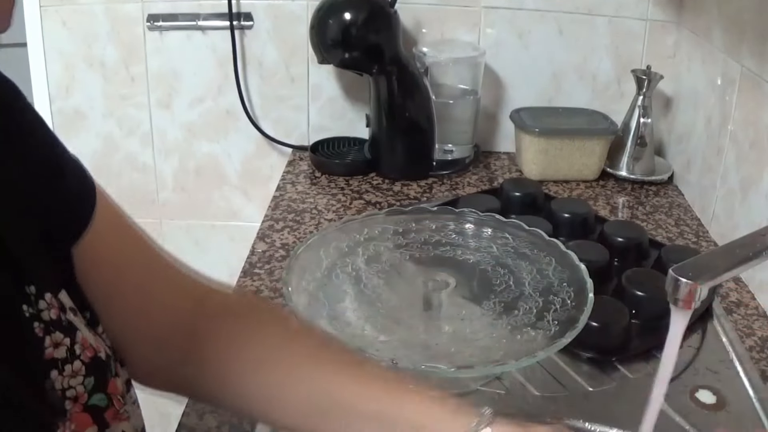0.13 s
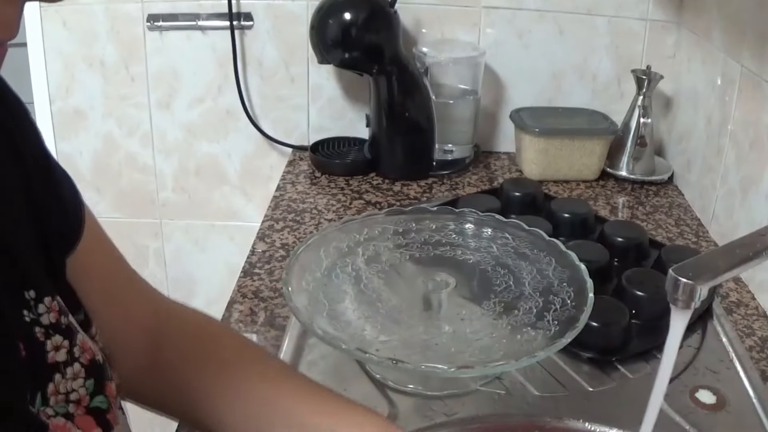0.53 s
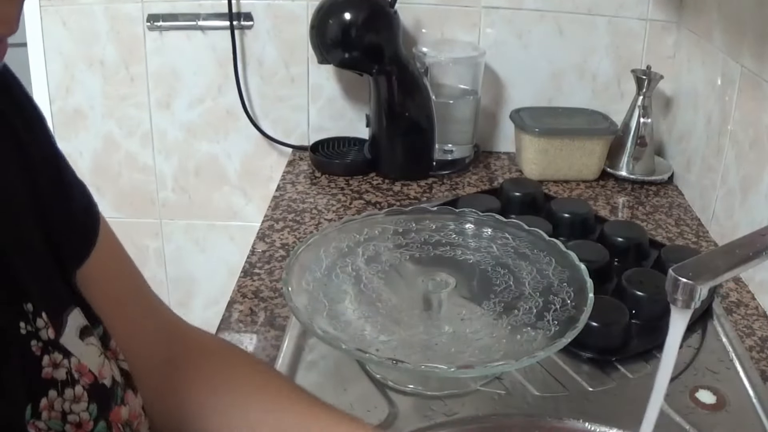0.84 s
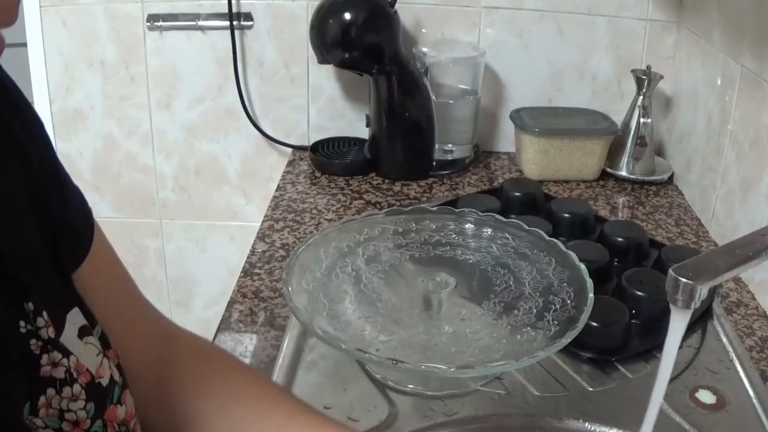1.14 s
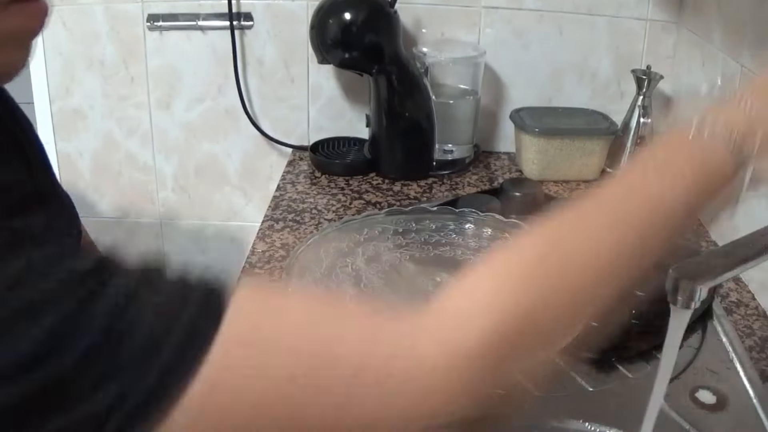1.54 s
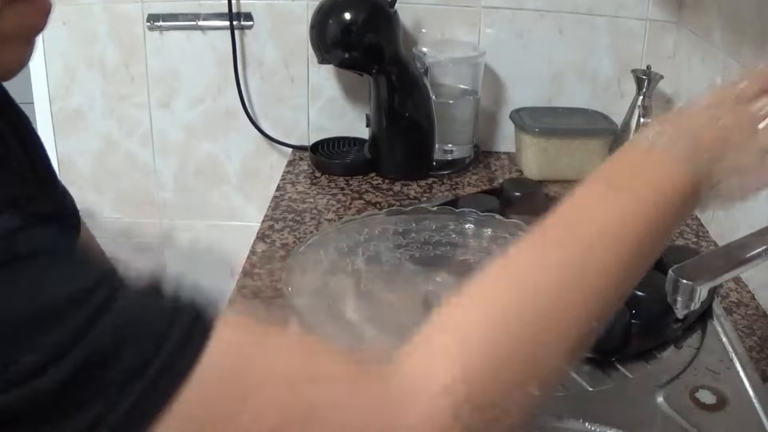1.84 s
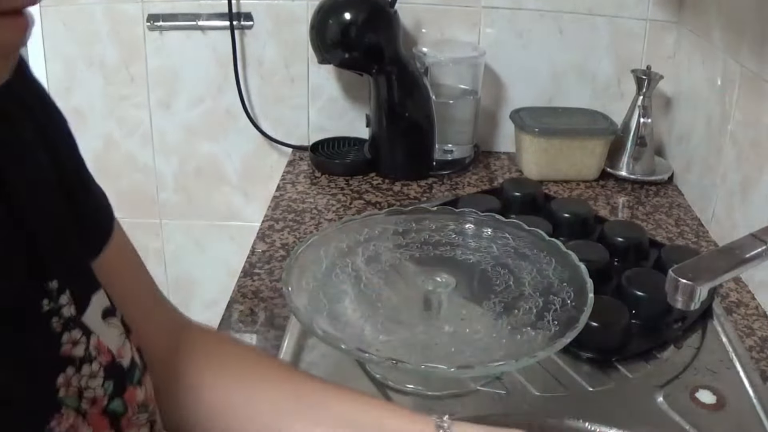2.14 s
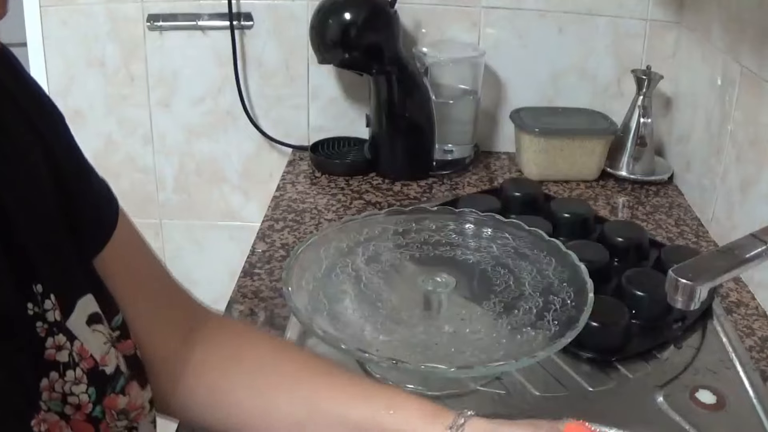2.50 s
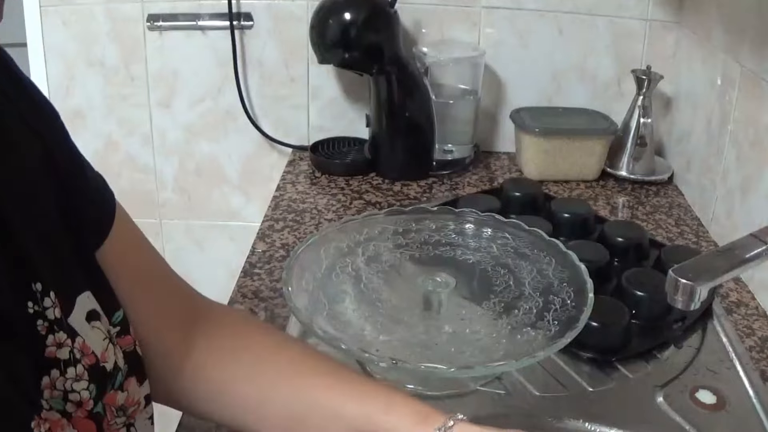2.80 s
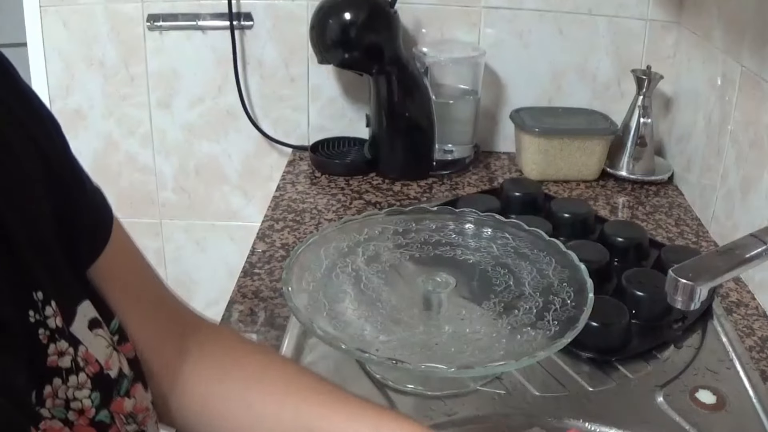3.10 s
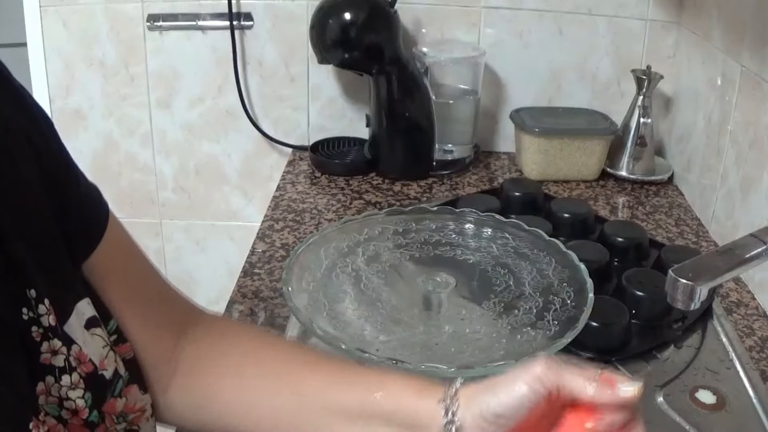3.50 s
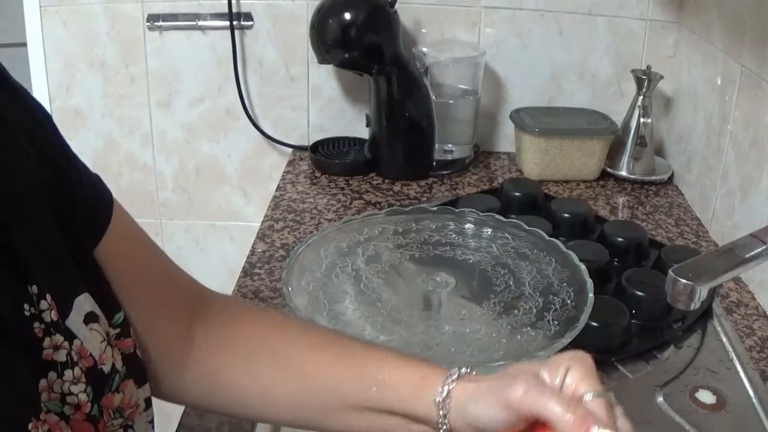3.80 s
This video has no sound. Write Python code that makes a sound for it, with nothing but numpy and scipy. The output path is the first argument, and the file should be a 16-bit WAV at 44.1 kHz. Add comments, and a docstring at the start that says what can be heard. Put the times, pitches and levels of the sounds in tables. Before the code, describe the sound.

A kitchen tap runs softly over a cloth, then brightly on bare steel, and shuts off with sharp drops and dull knocks; a wrung cloth squelches and drips. Close microphone, small tiled kitchen.

```python
"""A kitchen tap runs over a cloth, then straight into a steel sink, and is shut off with a few last drops.
The cloth is wrung out: it squelches, and water patters and bubbles in the basin.
Water is built from noise splats, dying sines for bubbles and a fine wash; the steel from ringing modes.
Noise pushes thump the sink bottom, and a small tiled kitchen reflects it all over quiet room noise."""
import sys
import numpy as np
from scipy import signal
from scipy.fft import rfft, irfft
from scipy.io import wavfile

SR = 44100
rng = np.random.default_rng(int(sys.argv[2]) if len(sys.argv) > 2 else 0)


def wav_out(sig):
    """Save sig, one row per channel (or a flat mono array), as 16-bit PCM at SR to the path in sys.argv[1]."""
    wavfile.write(sys.argv[1], SR, np.round(np.clip(np.atleast_2d(sig).T, -1, 1) * 32767).astype(np.int16))


N = 174195
TIME = np.arange(N) / SR
EDGE_HZ = 11080  # upper limit of the recorder


def amp(db):
    """Decibels to gain."""
    return 10 ** (np.asarray(db) / 20)


def unit(x):
    """Scales to rms 1."""
    return x / np.sqrt(np.mean(x ** 2) + 1e-20)


def level(points):
    """Gain over time from (s, dB) points, at -120 dB outside them."""
    return amp(np.interp(TIME, *np.transpose(points), left=-120, right=-120))


def read(points, hz):
    """Reads a table on a log-frequency axis."""
    f, value = np.transpose(points)
    return np.interp(np.log(hz + 1), np.log(f), value)


def colour(x, tone):
    """Filters a sound by a (Hz, dB) table up to the band edge, at rms 1."""
    hz = np.fft.rfftfreq(N, 1 / SR)
    return unit(irfft(rfft(x) * amp(read(tone, hz)) * (hz < EDGE_HZ), N))


def focus(x, hz, octaves):
    """Stresses the region round one frequency; peak 1."""
    b, a = signal.iirpeak(hz, max(1 / octaves, .4), fs=SR)
    y = signal.lfilter(b, a, x)
    return y / abs(y).max()


def add(mix, s, sound):
    """Mixes a sound in at time s."""
    part = mix[round(s * SR):][:len(sound)]
    part += sound[:len(part)]


def signs():
    """Random polarity for every sample."""
    return rng.choice([-1, 1], N)


def impacts(per_s, spread_db):
    """Impacts at random times; a positive spread makes a few larger, a negative one a few smaller."""
    size = amp(spread_db * np.minimum(rng.exponential(1, N), 2.3))
    return size * (rng.random(N) < per_s / SR)


def room_air():
    """Quiet room: steady noise with most of its weight in the lows."""
    # Spectrum of the room noise: pitch_hz, gain_db
    tone = [(25, -43), (60, -4), (130, -1.5), (250, 0), (500, -8.5), (1500, -14.5), (4000, -18.5),
            (6500, -58), (11000, -23)]
    return amp(-59) * colour(rng.standard_normal(N), tone)


def kitchen(x, right_db, near_db, near_s, room_db):
    """Direct sound, quick reflections off the basin walls, and the tail of the tiled room, in stereo."""
    # Decay of the room: pitch_hz, t60_s
    room_t60 = [(100, 0.12), (1000, 0.3), (4000, 0.16), (11000, 0.11)]
    # Strength of the reflections: pitch_hz, gain_db
    echo_tone = [(60, -32), (200, -9), (500, -2.5), (1500, 0.5), (4000, 2.5), (6500, 8), (9000, -1.5),
                 (11000, 2)]
    t = TIME[:SR // 2]
    hz, at, z = signal.stft(rng.standard_normal((2, len(t))), SR, nperseg=256)
    fading = z * amp(-60 * at / read(room_t60, hz)[:, None])
    tail = signal.istft(fading, SR, nperseg=256)[1][:, :len(t)] * (t > .005)
    near = rng.standard_normal((2, len(t))) * np.exp(-t / near_s) * (t > .0005)
    echo = amp(near_db) * near / np.linalg.norm(near[0])
    echo += amp(room_db) * tail / np.linalg.norm(tail[0])
    echo_gain = amp(read(echo_tone, np.fft.rfftfreq(SR, 1 / SR)))
    echo = irfft(rfft(echo, SR) * echo_gain, SR)[:, :len(t)]
    reflected = signal.fftconvolve(x[None], echo, axes=1)[:, :N]
    return (x + reflected) * amp([[-right_db / 2], [right_db / 2]])


def basin_ring(patch_db=0, detune=0):
    """The basin's answer to one tap, its modes varied by the spot and the water lying there."""
    # Modes of the steel basin: pitch_hz, level_db, t60_s (pitch and level before the variation)
    modes = [(83.7, -12.5, 0.36), (130, 0.5, 0.084), (154.4, 3, 0.096), (213, 2.5, 0.08), (264, 1, 0.066),
             (358.9, -6, 0.25), (455, -3.5, 0.026), (522.8, -6, 0.2), (580.8, -1, 0.13), (878, -7.5, 0.088),
             (1345, -8, 0.098), (1920, -7.5, 0.12), (2387, -6, 0.06)]
    t = TIME[:SR // 3]
    spots = rng.uniform(-1.34, 1, (len(modes), 2))
    ring = np.zeros(len(t))
    for k, ((hz, db, t60), (a, b)) in enumerate(zip(modes, spots)):
        tone = np.sin(2 * np.pi * hz * (1 + detune * b) * t)
        ring += (-1) ** k * amp(db + patch_db * a - 60 * t / t60) * tone
    return ring


def drumming(per_s=70, spread_db=4.5, patch_db=2, detune=0.024, count=10):
    """Falling water keeps the thin steel rumbling; each spot it lands on rings a little differently."""
    # Drumming of the sink bottom: time_s, level_db
    curve = [(0, -53.5), (.34, -46), (.41, -39), (.52, -51.5), (.9, -45), (1.8, -49.5), (2.1, -48.5),
             (2.5, -57), (2.66, -45), (2.8, -41.5), (3.03, -38.5), (3.2, -44.5), (3.55, -56), (3.75, -53.5),
             (3.95, -53.5)]
    out = np.zeros(N)
    for _ in range(count):
        blows = impacts(per_s, spread_db) * signs()
        out += signal.oaconvolve(blows, basin_ring(patch_db, detune))[:N]
    return level(curve) * unit(out)


def knocks(thud_db=-12, thud_s=0.085):
    """Soft blows: a dull thud and part of the basin's ring."""
    # Knocks on the basin: start_s, level_db, brightest_hz
    blows = [(1.921, -36, 607), (1.948, -38.5, 597), (2.043, -38.5, 620), (3.701, -45, 1345),
             (3.752, -39.5, 600), (3.754, -35.5, 1345)]
    out, ring = np.zeros(N), basin_ring()
    for s, db, hz in blows:
        thud = rng.standard_normal(len(ring)) * np.exp(-TIME[:len(ring)] / thud_s)
        knock = focus(ring, hz, octaves=0.19) + amp(thud_db) * focus(thud, hz, octaves=0.23)
        add(out, s, amp(db) * focus(knock, hz, octaves=0.79))
    return out


def thumps(swell_s=0.011):
    """Each gush gives the steel a soft, dull push and flexes the whole bottom, some far more than others."""
    # Gushes on the sink bottom: start_s, level_db, flex_db (deep flex relative to the push)
    gushes = [(.362, -33.5, -6.5), (0.43, -34, -5), (0.887, -46.5, 2.5), (.92, -60, -2), (1.058, -41.5, -3),
              (1.27, -54, -5), (1.73, -49, -11), (1.813, -42, -6), (2.79, -46, 3), (2.869, -38.5, -15),
              (2.96, -40, -15), (3.03, -45, -26), (3.14, -42, -26), (3.415, -50.5, -16), (3.68, -50.5, -10),
              (3.73, -47, -8)]
    # Spectrum of the push: pitch_hz, gain_db
    push_tone = [(50, -33), (100, -15), (140, -8.5), (230, 8), (310, -5), (540, -7), (750, -14),
                 (3000, -57)]
    # Spectrum of the flexing bottom: pitch_hz, gain_db
    flex_tone = [(30, -32), (55, -22), (78, 6), (110, 13), (300, -31), (1000, -70)]
    push, flex = np.zeros((2, N))
    age = TIME[:SR // 5] / swell_s
    swell = age * np.exp(1 - age)
    for s, db, flex_db in gushes:
        add(push, s, amp(db) * swell)
        add(flex, s, amp(db + flex_db) * swell)
    dull = push * colour(rng.standard_normal(N), push_tone)
    return dull + flex * colour(rng.standard_normal(N), flex_tone)


def drops(rise_s=0.00013, ring_db=-25):
    """Drops slap brightly, very short on bare steel, longer in a splash; the basin rings faintly with each."""
    # Single drops: start_s, level_db, brightest_hz, width_octaves, decay_s
    slaps = [(.386, -9.5, 7960, 0.88, 0.0026), (.405, -8.5, 8100, 0.95, 0.0022),
             (.432, -10, 8200, 1.8, 0.0043), (0.557, -12, 9800, 0.88, 0.0018),
             (1.037, -15, 8800, 0.37, .0016), (1.864, -13, 9200, 0.43, .0009),
             (1.876, -10.5, 7700, 1.2, 0.0013), (1.898, -7.5, 7600, 1.1, 0.0015),
             (1.906, -10.5, 9600, 0.93, 0.00099), (1.917, -12, 8000, 1.2, .0018),
             (1.941, -14.5, 10100, 0.36, 0.0016), (1.9485, -10.5, 9400, 0.9, 0.00067),
             (1.972, -20, 8000, 1.5, 0.0011), (2.004, -19.5, 7200, 2.5, 0.0014),
             (2.0428, -14, 8200, 1.85, 0.00076), (2.238, -35, 4200, 1.2, .0008),
             (2.347, -30.5, 1260, 0.56, 0.0098), (2.634, -15.5, 5130, 1.3, 0.0045),
             (2.655, -18.5, 3950, 0.74, .006), (2.7302, -18, 2560, 0.54, 0.0063),
             (2.8447, -16, 3050, 0.43, 0.0067), (2.853, -23, 4460, 0.6, .005),
             (2.905, -13.5, 9300, 0.32, 0.0018), (2.913, -17, 7500, 2.1, 0.0049),
             (2.9846, -16.5, 7600, 1.5, .002), (3.033, -21, 7050, 1.6, 0.0025),
             (3.16, -30, 7800, 0.21, 0.0025), (3.18, -31, 7300, 0.45, .0016),
             (3.1895, -22.5, 10600, 0.1, 0.0019), (3.221, -24.5, 5500, .35, 0.0042),
             (3.509, -43, 3450, 2, .001)]
    out, t = np.zeros(N), TIME[:SR // 25]
    for s, db, hz, octaves, decay_s in slaps:
        slap = rng.standard_normal(len(t)) * np.exp(-t / decay_s) * (1 - np.exp(-t / rise_s))
        add(out, s, amp(db) * focus(focus(slap, hz, octaves), hz, octaves))
        ring = basin_ring(patch_db=2.5, detune=0.044)
        add(out, s, amp(db + ring_db) * focus(ring, hz=1900, octaves=0.96))
    return out


def bubble(hz, cycles, rise):
    """A dying sine whose pitch rises as the bubble nears the surface."""
    age = np.arange(0, 6 * cycles, hz / SR) / cycles  # in decay times of so many cycles
    tone = np.sin(2 * np.pi * cycles * age * (1 + rise * age))
    return tone * np.exp(-age) * (1 - np.exp(-age * 8))


def plops(cycles=7.0, longest_s=0.0075):
    """Larger bubbles in the puddle, each a short rising blip; the low ones ring longer."""
    # Single bubbles: start_s, level_db, pitch_hz (at the start of the rise)
    bubbles = [(0.209, -28, 1080), (.228, -29, 1075), (.326, -13, 2290), (.329, -16.5, 2550),
               (1.404, -23.5, 1285), (2.003, -27.5, 2220), (2.0424, -29.5, 2100), (2.115, -37.5, 2220),
               (2.238, -29.5, 3230), (2.252, -28.5, 4300), (2.385, -37, 2390), (2.42, -29, 2400),
               (2.43, -30, 1920), (2.456, -32, 1980), (2.478, -32, 1800), (2.52, -24.5, 3400),
               (2.556, -35, 724), (2.699, -24, 1820), (2.704, -21, 2540), (2.7312, -12, 2780),
               (2.736, -15, 2535), (2.75, -19, 2840), (2.764, -21.5, 2570), (2.843, -23, 3280),
               (2.846, -28, 2480), (2.857, -24, 4800), (2.874, -16.5, 4500), (2.888, -24.5, 2280),
               (2.9867, -23, 4330), (3.044, -24.5, 1895), (3.095, -39, 1950), (3.13, -32.5, 1940),
               (3.255, -35, 1870), (3.313, -35, 1970), (3.1624, -21.5, 4920), (3.3775, -33, 2190),
               (3.459, -38, 3220), (3.473, -37, 2770), (3.592, -36, 1920), (3.635, -33.5, 3700),
               (3.83, -38, 3270)]
    out = np.zeros(N)
    for s, db, hz in bubbles:
        add(out, s, amp(db) * bubble(hz, min(cycles, longest_s * hz), rise=0.0073))
    return out


def water(curve, tone, splats_per_s, spread_db, splat_s, bubbles_per_s, bubbles_db, cycles, wash_db):
    """Short splats, tiny bubbles of all sizes and a fine wash, following one level curve."""
    t = TIME[:SR // 50]
    # The energies of overlapping splats add up; random signs turn their envelope into noise
    energy = signal.oaconvolve(impacts(splats_per_s, spread_db) ** 2, np.exp(-2 * t / splat_s))[:N]
    splats = unit(np.sqrt(abs(energy)) * signs())
    pitches = np.geomspace(800, 11000, 48)
    births = impacts(bubbles_per_s, spread_db) * signs()
    kind = rng.choice(len(pitches), N, p=pitches / pitches.sum())
    fizz = np.zeros(N)
    for k, hz in enumerate(pitches):
        blip = np.sqrt(hz) * bubble(hz, cycles, 0.0084)
        fizz += signal.oaconvolve(births * (kind == k), blip)[:N]
    wash = amp(wash_db) * rng.standard_normal(N)
    return level(curve) * colour(splats + amp(bubbles_db) * unit(fizz) + wash, tone)


def blur(field, width, axis):
    """Smooths a random field along one axis."""
    f = np.fft.rfftfreq(field.shape[axis])
    smooth = np.expand_dims(np.exp(-(f * width) ** 2 * 2), 1 - axis)
    return irfft(rfft(field, axis=axis) * smooth, field.shape[axis], axis=axis)


def gurgle(x, surge_db, patch_db, surge_s=0.041, patch_s=0.019, patch_hz=900):
    """Uneven flow: the whole sound surges while patches of its spectrum swell and fade."""
    hz, at, z = signal.stft(x, SR, nperseg=256, noverlap=192)
    surge = unit(blur(rng.standard_normal((1, len(at))), surge_s / at[1], axis=1))
    patches = blur(rng.standard_normal(z.shape), patch_s / at[1], axis=1)
    patches = unit(blur(patches, patch_hz / hz[1], axis=0))
    gain = unit(amp(surge_db * surge + patch_db * patches))
    return signal.istft(z * gain, SR, nperseg=256, noverlap=192)[1][:N]


def stray_drips():
    """Sparse splats and long-ringing bubbles dripping alongside the wrung water."""
    # Dripping: time_s, level_db
    curve = [(2.55, -69), (2.7, -38), (2.93, -45.5), (3.08, -54), (3.3, -54.5), (3.7, -53.5), (3.95, -59)]
    # Spectrum of the drips: pitch_hz, gain_db
    tone = [(300, -33), (1400, -2.5), (2000, 2), (3500, 2), (5000, -4), (6500, -7.5), (11000, -4.5)]
    return water(curve, tone, splats_per_s=130, spread_db=3.0, splat_s=0.0021,
                 bubbles_per_s=300, bubbles_db=-1, cycles=17.5, wash_db=-5)


def pour():
    """Wrung water falling into the basin: dense short splats with equally strong bubbles."""
    # Falling water: time_s, level_db
    curve = [(2.52, -50.5), (2.62, -34.5), (2.64, -27.5), (2.67, -34.5), (2.7, -37), (2.77, -30),
             (2.82, -37), (2.91, -26.5), (2.96, -38), (3.04, -38), (3.12, -48.5), (3.3, -58), (3.42, -76)]
    # Spectrum of the falling water: pitch_hz, gain_db
    tone = [(40, -15), (140, 0), (500, 2), (800, -3), (1550, -15), (1900, -3), (2800, -4.5), (3500, 2.5),
            (5100, 1.5), (6300, -5), (7500, -1), (9200, 2.5), (11000, 2)]
    return water(curve, tone, splats_per_s=1500, spread_db=4.5, splat_s=0.00044,
                 bubbles_per_s=3500, bubbles_db=0, cycles=9.0, wash_db=-8.5)


def pocket(width_hz=520, per_s=2200, spread_db=3):
    """Water pressed through the cloth rings a hollow between the hands, which changes size."""
    # Hollow between the squeezing hands: time_s, resonance_hz, level_db
    hollow = [(2.35, 2450, -52), (2.38, 2480, -43), (2.425, 2450, -39.5), (2.45, 2000, -42),
              (2.49, 1830, -45), (2.53, 1800, -63)]
    s, hz, db = np.transpose(hollow)
    # A low-pass resonance at zero Hz, turned up to the moving pitch
    turn = np.exp(2j * np.pi * np.cumsum(np.interp(TIME, s, hz)) / SR)
    r = np.exp(-np.pi * width_hz / SR)
    squirts = impacts(per_s, spread_db) * signs() / turn
    ring = signal.lfilter([1], np.poly([r, r]), squirts)
    return level(np.transpose([s, db])) * unit((turn * ring).real)


def squelch():
    """The squeezed cloth: a strong wash over even-sized splats and weaker, short bubbles."""
    # Squeezing: time_s, level_db
    curve = [(2.1, -49.5), (2.16, -60), (2.185, -40), (2.21, -53), (2.305, -46.5), (2.325, -38),
             (2.35, -38), (2.45, -37.5), (2.55, -39.5), (2.7, -42.5), (3.0, -60), (3.3, -48.5),
             (3.49, -62.5), (3.52, -50), (3.64, -49), (3.78, -54.5), (3.95, -58)]
    # Spectrum of the squelch: pitch_hz, gain_db
    tone = [(150, -31), (800, -5), (1300, -1.5), (1550, -4), (1850, -3), (2450, 2), (2750, -4), (3400, -1),
            (4000, -4.5), (5100, -4.5), (6400, -15), (8200, -6), (11000, -8.5)]
    return water(curve, tone, splats_per_s=1200, spread_db=-2.5, splat_s=0.00081,
                 bubbles_per_s=5000, bubbles_db=-7, cycles=5.8, wash_db=4.0)


def soak():
    """The tap stream soaking the cloth: mostly wash, with even splats and bubbles."""
    # Stream on the cloth: time_s, level_db
    curve = [(0, -28), (.07, -28), (.11, -26), (.2, -26), (.33, -25), (.41, -31.5), (.55, -38), (.7, -95)]
    # Spectrum of the soaking: pitch_hz, gain_db
    tone = [(150, -23.5), (700, -12), (1200, -8.5), (1720, -12.5), (1920, 0), (2500, -7), (2800, -5.5),
            (3350, -1.5), (4100, -5), (5250, -4.5), (6200, -13), (8500, -9), (11000, -6.5)]
    return water(curve, tone, splats_per_s=1500, spread_db=2.0, splat_s=0.00085,
                 bubbles_per_s=2900, bubbles_db=0, cycles=11, wash_db=4.0)


def spray():
    """Fast droplets thrown off the basin, breaking into bright spatters as the tap closes."""
    # Spray: time_s, level_db (before the trim below)
    curve = [(0, -58), (.37, -37), (.39, -23.5), (1.76, -22), (1.85, -19.5), (1.9, -32), (2.0, -51)]
    # Spectrum of the spray: pitch_hz, gain_db
    tone = [(1000, -41), (3500, -23), (6400, -9.5), (8000, 1.5), (9500, 2), (11000, -1.5)]
    return amp(-6.0) * water(curve, tone, splats_per_s=230, spread_db=3.5, splat_s=0.00043,
                             bubbles_per_s=380, bubbles_db=-6, cycles=7.0, wash_db=-19)


def tap_stream():
    """The tap stream hitting the bare basin: splats of very uneven size, bubbles and wash."""
    # Stream on bare steel: time_s, level_db (before the trim below)
    curve = [(0, -54), (.37, -34), (.39, -25), (.5, -23.5), (.85, -22.5), (1.2, -23.5), (1.44, -22),
             (1.48, -26.5), (1.55, -22), (1.76, -24.5), (1.84, -26), (1.87, -31.5), (1.92, -34.5),
             (1.97, -42), (2.06, -47), (2.15, -74)]
    # Spectrum of the stream: pitch_hz, gain_db
    tone = [(30, -52), (80, -10.5), (220, -14), (400, -28), (600, -14), (900, -13), (1350, -9), (1600, -12),
            (1950, -6.5), (2800, -5.5), (3250, -1), (4300, -3.5), (5300, -3.5), (6400, -9.5), (8200, -1.5),
            (9300, -1), (11000, 0)]
    return amp(-1.31) * water(curve, tone, splats_per_s=1300, spread_db=5.0, splat_s=0.0019,
                              bubbles_per_s=3500, bubbles_db=-4.5, cycles=10.4, wash_db=-3.0)


def scene():
    """Quiet room, basin, cloth and tap, each placed in the kitchen."""
    air = kitchen(room_air(), right_db=-0.5, near_db=3.0, near_s=0.0032, room_db=-4.0)
    steel = drumming() + knocks() + thumps()
    steel = kitchen(steel, right_db=0.0, near_db=-8.5, near_s=0.0041, room_db=-17.0)
    slaps = kitchen(drops(), right_db=2.5, near_db=-15, near_s=0.01, room_db=-16.5)
    blips = kitchen(plops(), right_db=2, near_db=-15.0, near_s=0.025, room_db=-9)
    wringing = gurgle(squelch() + pour(), surge_db=2, patch_db=0.5)
    cloth = wringing + pocket() + stray_drips()
    cloth = kitchen(cloth, right_db=1.0, near_db=-8.0, near_s=0.0029, room_db=-16.5)
    rush = gurgle(tap_stream() + soak(), surge_db=0.8, patch_db=1.6,
                  surge_s=.012, patch_s=.016, patch_hz=450)
    tap = kitchen(rush + spray(), right_db=2.0, near_db=-17, near_s=0.0023, room_db=-11.5)
    return air + steel + slaps + blips + cloth + tap


def record(dry):
    """The recorder's steep band limit."""
    low_pass = signal.firwin(1023, EDGE_HZ, window=("kaiser", 8), fs=SR)
    return signal.oaconvolve(dry, low_pass[None], "same")


dry = scene()
out = record(dry)
wav_out(out)
```